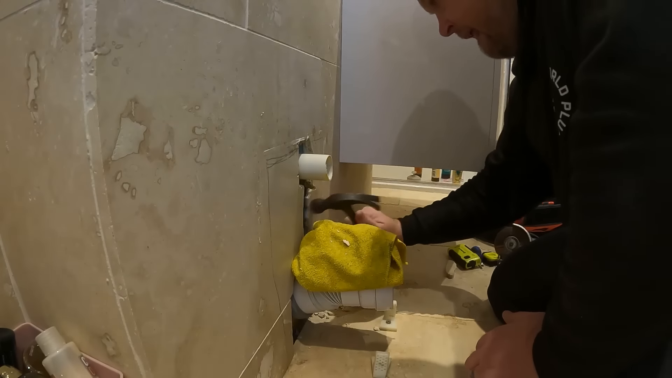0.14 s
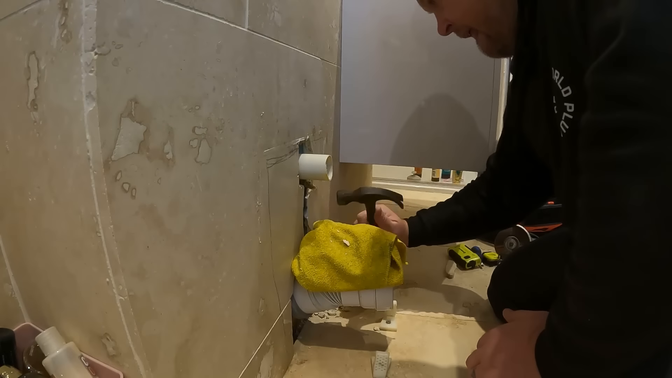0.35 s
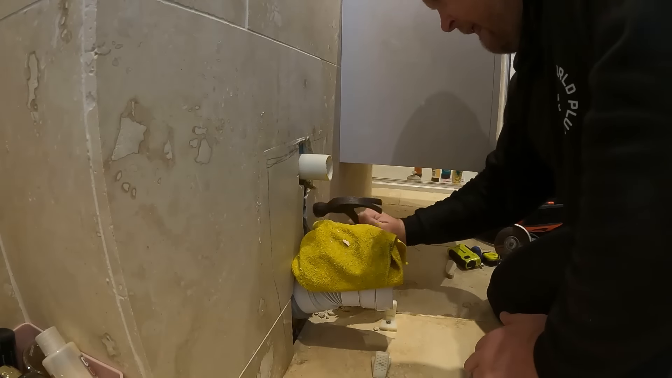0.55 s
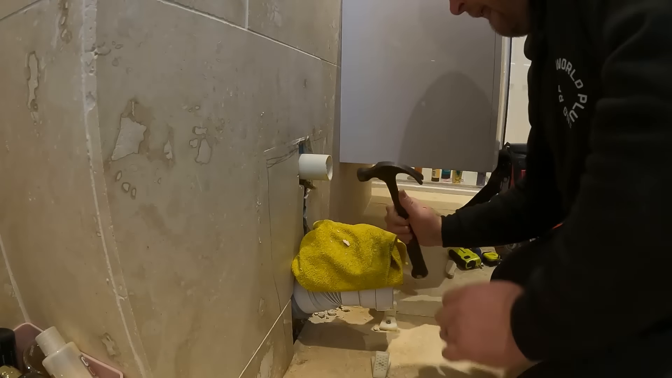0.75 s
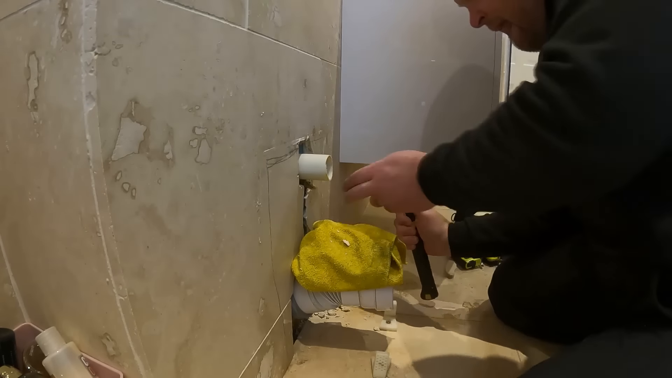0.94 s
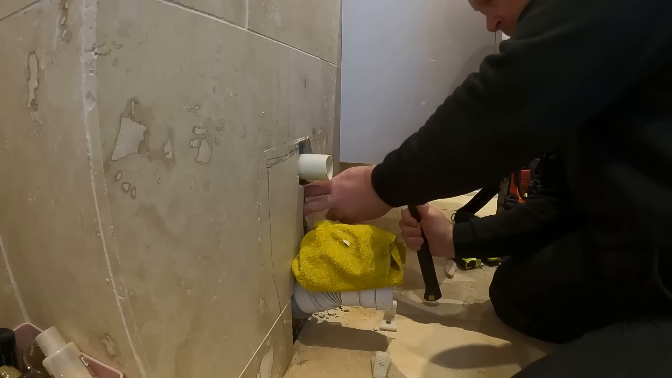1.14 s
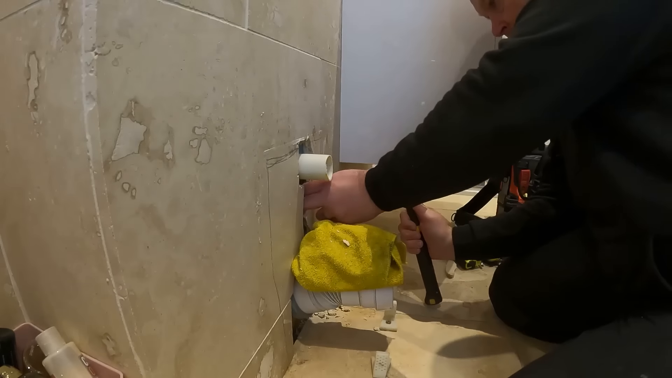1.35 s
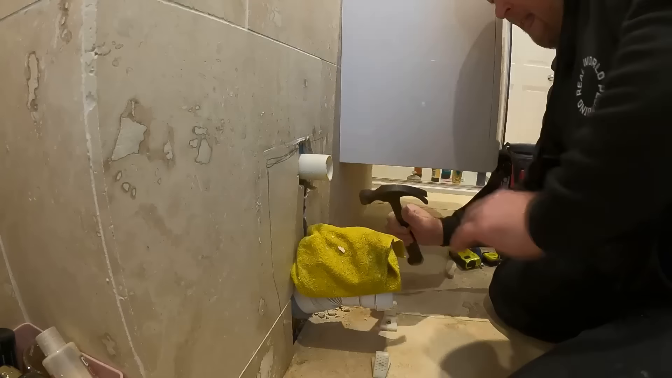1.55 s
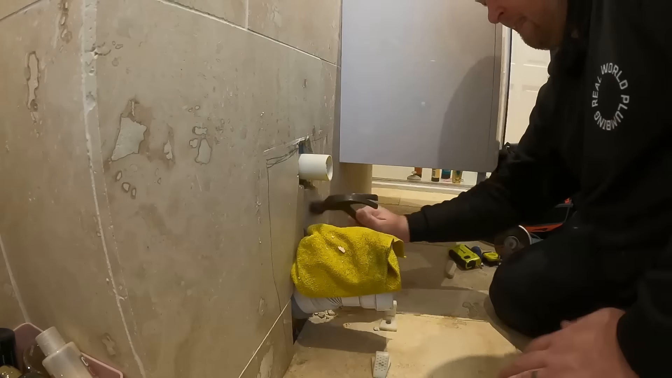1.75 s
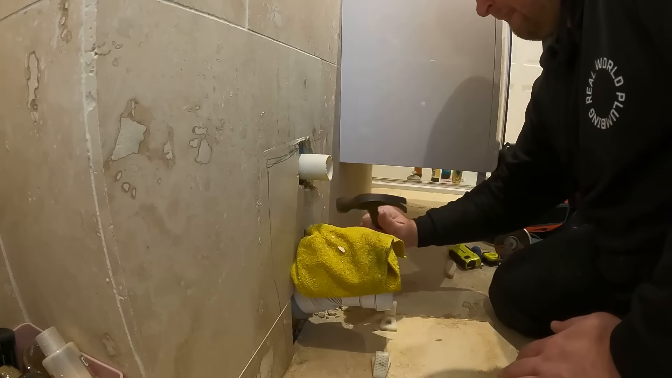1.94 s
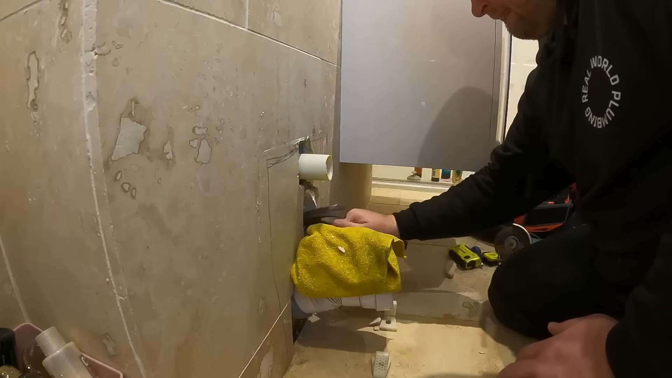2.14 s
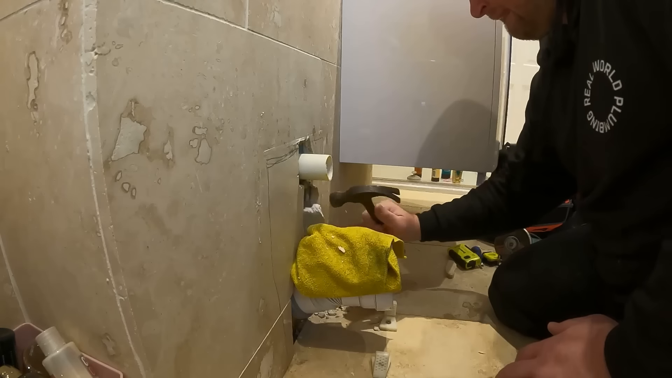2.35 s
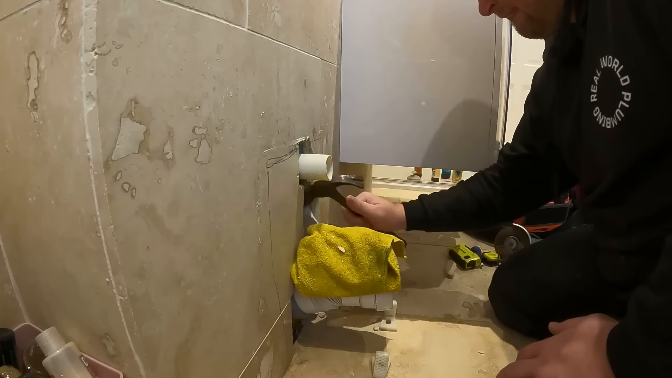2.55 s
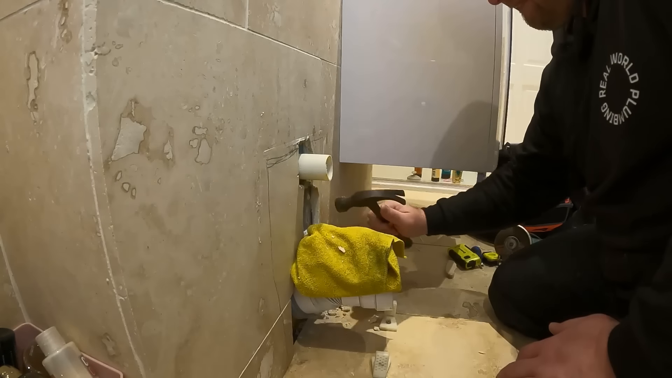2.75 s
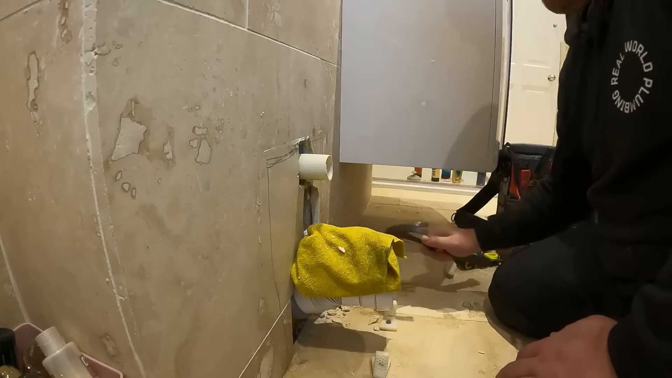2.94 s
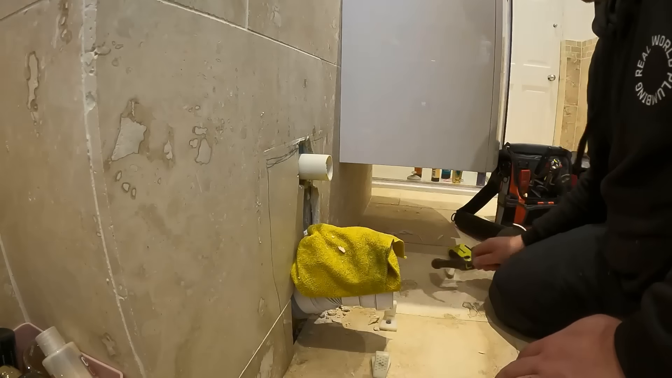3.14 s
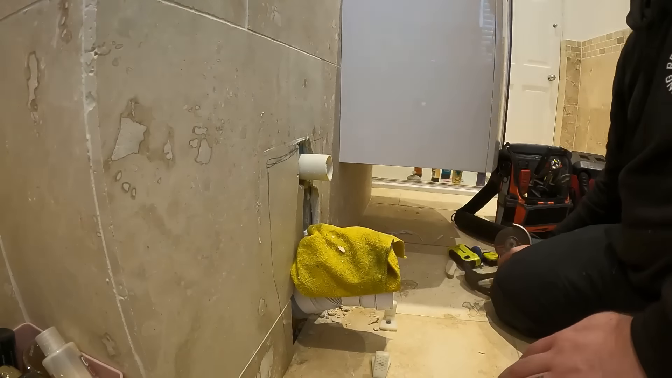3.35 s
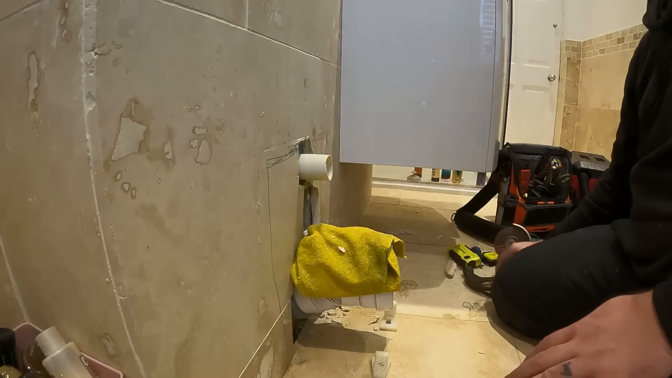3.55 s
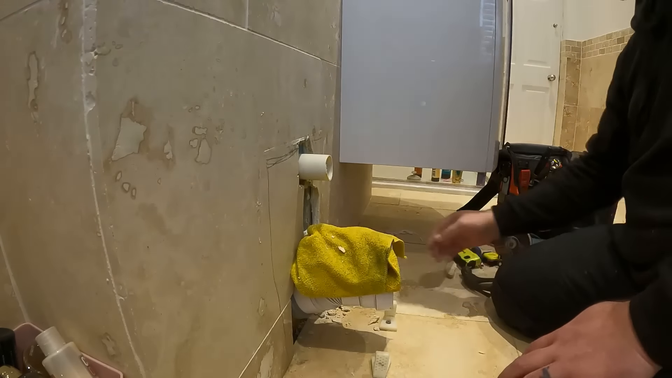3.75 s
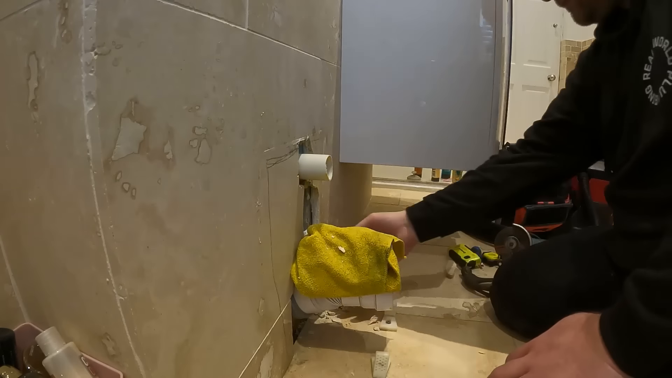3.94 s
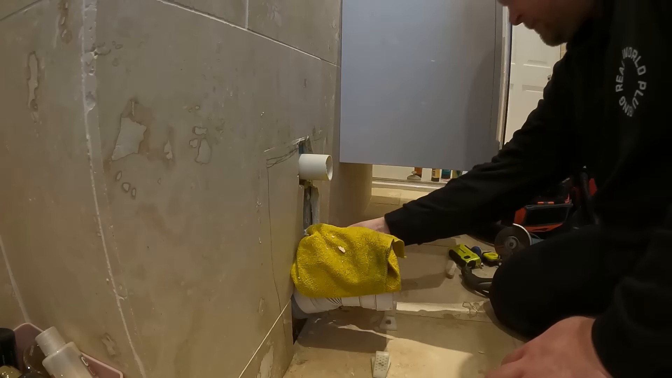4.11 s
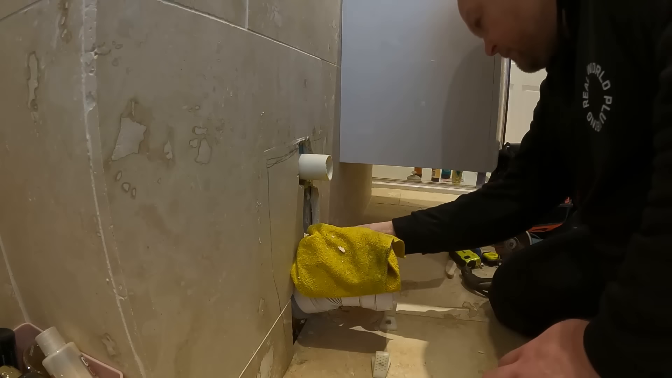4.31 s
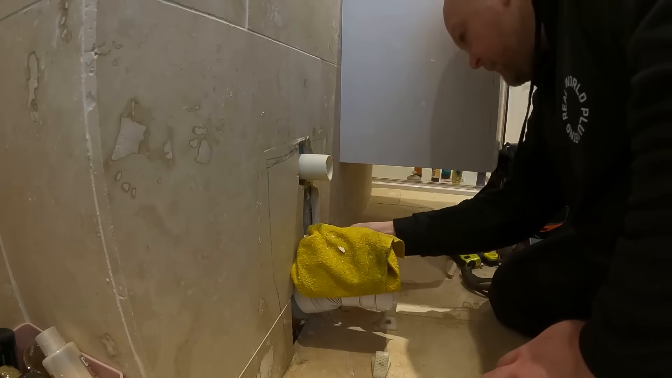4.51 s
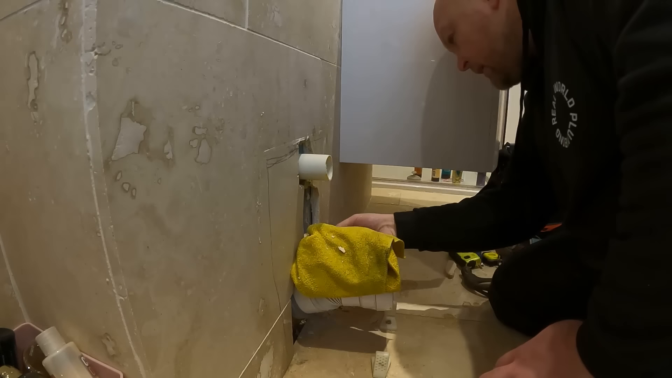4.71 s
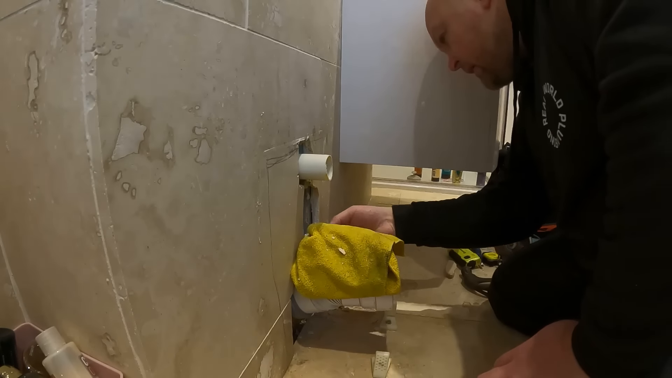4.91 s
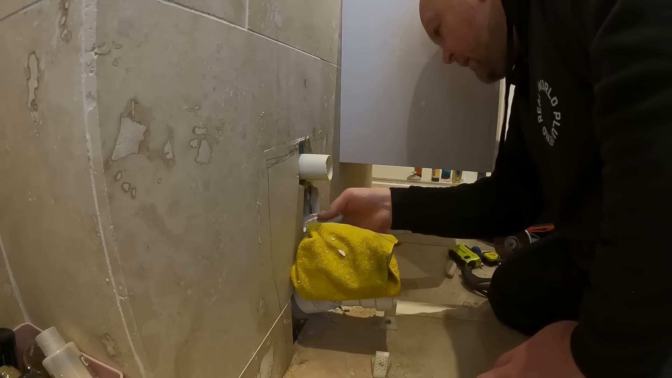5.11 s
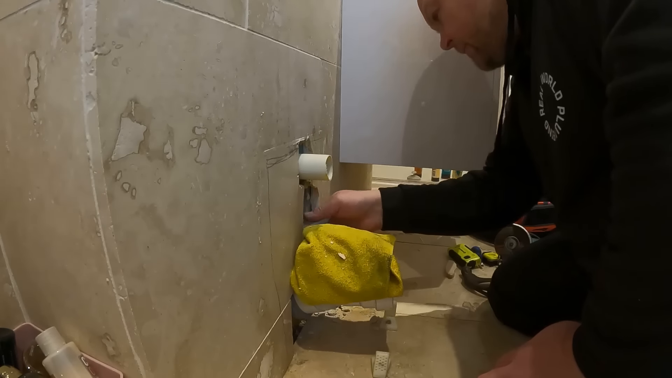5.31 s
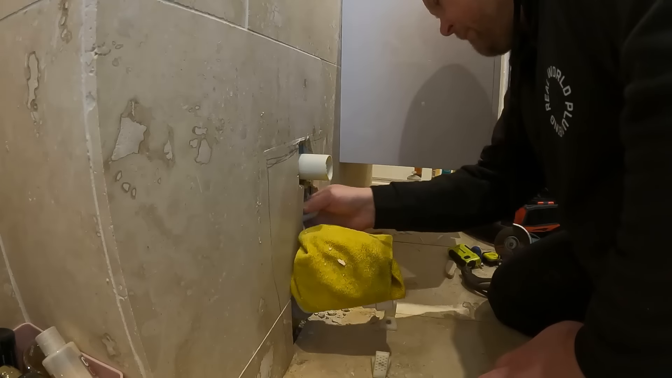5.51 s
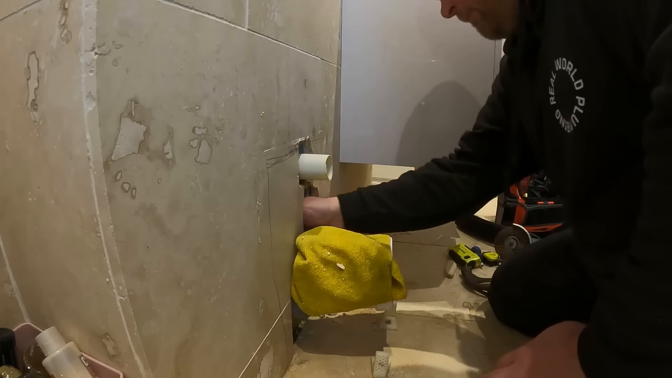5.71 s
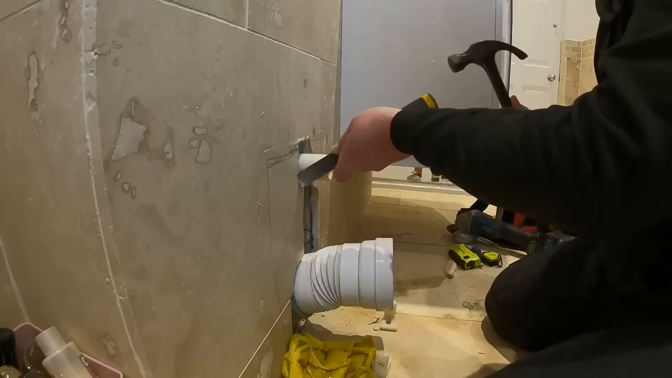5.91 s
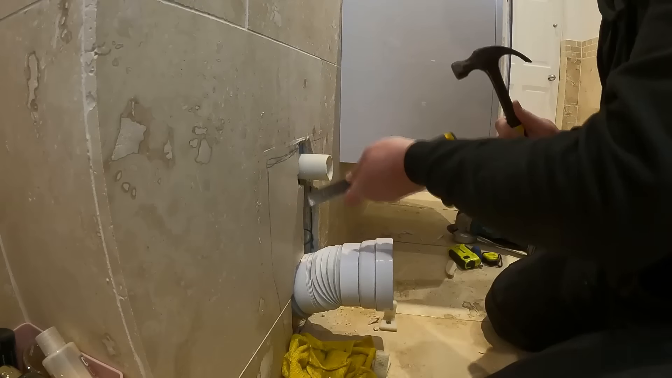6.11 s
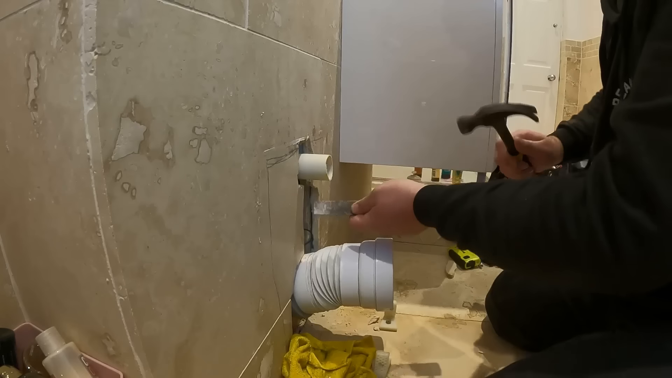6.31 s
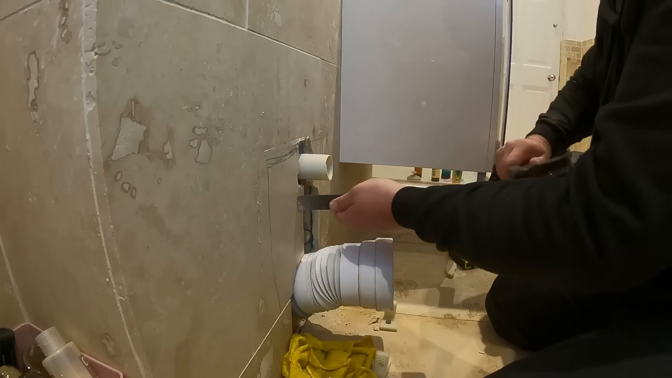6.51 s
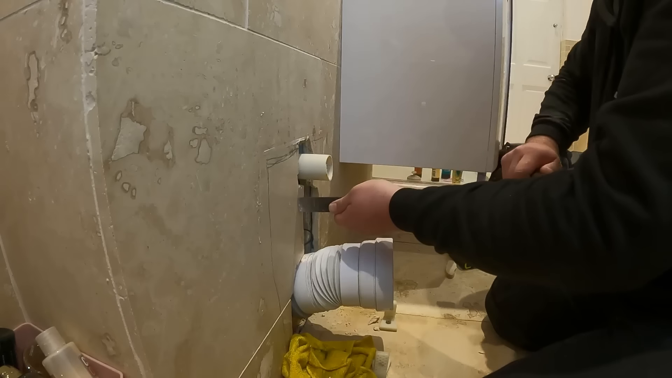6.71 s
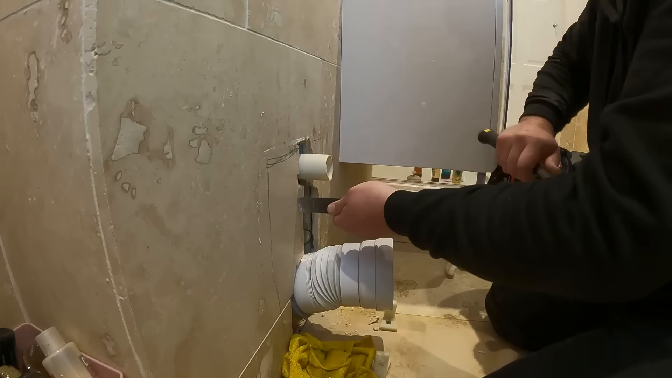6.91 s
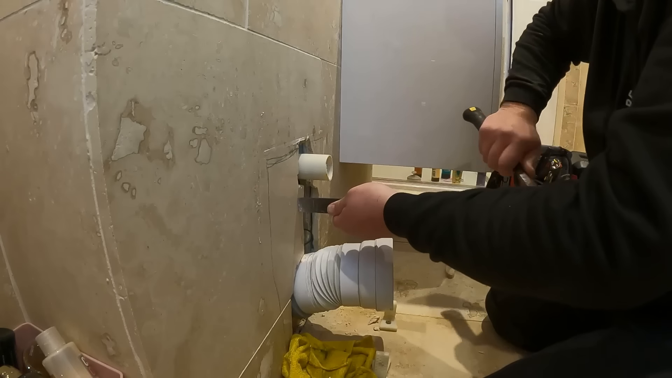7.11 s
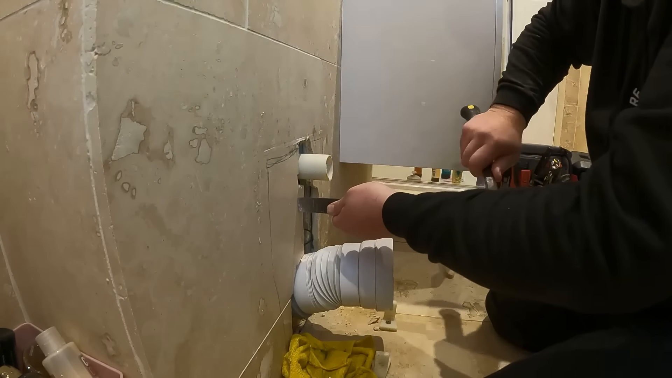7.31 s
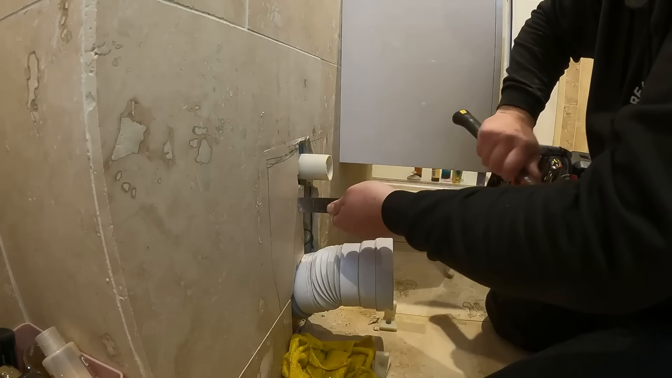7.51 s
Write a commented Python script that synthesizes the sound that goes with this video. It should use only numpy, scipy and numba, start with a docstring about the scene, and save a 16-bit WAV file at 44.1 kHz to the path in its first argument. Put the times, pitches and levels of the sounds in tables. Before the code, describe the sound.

Close, sharp hammer strikes on tile with dense bathroom echo, followed by rummaging in grit, clacking fragments, soft thuds and late low rumble.

```python
"""The tail of a hammer blow is still ringing in a hard bathroom when the next blows land close to a small
camera. Tiles come off the wall: each contact ticks, cracks, rings damped tile and hammer modes and thumps the
boxed wall. Shards clack and slide, tools are set down, a hand rummages in grit behind a pipe; thin high tones
flicker. Dense echoes hang for most of a second; the camera's gain control ducks at each loud blow, so the room
seems to swell just after it. Steady building noise lies behind; late on, the background holds more bass noise."""
import sys
import numpy as np
from scipy import signal
from scipy.fft import rfft, irfft
from scipy.io import wavfile
from scipy.ndimage import uniform_filter1d, minimum_filter1d
from numba import njit

SR = 44100
rng = np.random.default_rng(int(sys.argv[2]) if len(sys.argv) > 2 else 0)


def wav_record(signal):
    """Record a signal, one row per channel, as 16-bit PCM in the file named by sys.argv[1]."""
    frames = np.transpose(np.atleast_2d(signal))
    bounded = np.clip(frames, -1, 1)
    # unit amplitude maps onto the largest positive 16-bit level
    quanta = np.round(bounded * 32767).astype(np.int16)
    wavfile.write(sys.argv[1], SR, quanta)


N = 333382
LEAD = 13230  # samples played before the start, so that an earlier blow still rings

# Levels are those ahead of the microphone colour and the gain control.
# hammer on tile, floor or chisel; ring, thump and room are relative to the level:
# start_s, level_db, pitch_hz, tilt_db_per_octave, ring_db, thump_db, room_db
BLOWS = [(-.27, 20.5, 1760, 5.5, -11, -18, -12), (.0285, 13, 2300, 2, -1, -9, 1.5),
         (.3255, 10, 2300, 1, -0.5, -9, 4), (.6068, 5.5, 2300, 1, 0.5, -7.5, 6),
         (1.9185, 17.5, 5150, -3.5, -1.5, -14, -3.5), (2.1360, 2, 4600, -0.5, -20, -33, 1.5),
         (2.2083, 13.5, 5520, -3.5, 4, -18.5, -0.5), (2.7640, -9.5, 1060, -1, -2.5, -5, 4.5),
         (3.5283, -1, 2130, -1.5, 1.5, -7, 6), (3.6206, 8, 2770, 0.5, 7, -13, 2),
         (3.7892, -7, 2260, -3.5, 9, -8, 8), (6.6746, -5, 1560, -4, 3.5, -1, 0),
         (7.4830, -7.5, 1800, -3, 7.5, 3, 1.5)]
# shards and tools touching: start_s, level_db, pitch_hz, ring_db, room_db
CLACKS = [(1.5863, -29, 3900, -19, 20), (1.8894, -30, 1800, -3, 26), (2.605, -15.5, 1370, 0.5, 5),
          (2.6925, -20.5, 1510, -1, 1), (2.735, -26, 2540, 0, 9), (2.807, -25.5, 3000, 4, -11),
          (2.970, -20.5, 3600, -8, 0), (2.984, -33, 3600, -6, 6), (3.041, -32, 2620, 1, -11),
          (3.1943, -32.5, 3660, -6, 15.5), (3.284, -45, 3170, 9, -1), (4.3001, -28.5, 3120, -10, 21.5),
          (4.314, -16.5, 3200, -3.5, 4), (4.4014, -30, 1900, -4, 6), (4.4351, -15, 2350, 0, 3),
          (4.46, -20.5, 2280, 3, 4.5), (4.476, -12.5, 2350, -6, -10), (4.613, -24.5, 2210, 1, 7),
          (4.8202, -10, 4680, 5, 8), (4.915, -17.5, 3600, 4, 7), (4.952, -29, 950, -7, 1),
          (5.0287, -28, 2600, -2, 12), (5.0865, -22.5, 1560, -11, -6), (5.093, -29, 1560, -2, -11),
          (5.108, -23.5, 1520, -1, 4), (5.1349, -25.5, 950, 3, -3), (5.1436, -23, 940, 4, 1),
          (5.1596, -16, 2020, 0, 9), (5.169, -17, 1300, -6, -3.5), (5.181, -26.5, 940, 10.5, -7),
          (5.2219, -20.5, 1840, 1, -20), (5.252, -29, 1990, 4, 10.5), (5.3843, -26.5, 2224, -4, -1),
          (5.486, -39, 950, 4.5, 9), (5.5071, -14, 2670, 1.5, -1), (5.523, -13.5, 1180, -0.5, 0),
          (5.552, -28, 2300, -5, 4), (5.571, -26, 2500, 0, 2), (5.6908, -24, 2300, 1, -20),
          (5.7479, -24.5, 3000, -7, 2), (6.0412, -38, 1515, -3, 3), (6.0523, -23.5, 1670, -9, 3),
          (6.075, -25.5, 1560, -5, 3), (6.095, -32, 2270, 0, 4), (6.2358, -26, 1600, -4.5, -11),
          (6.247, -27.5, 3600, -7, 6), (6.3736, -24, 5300, -4.5, -4), (6.3959, -26.5, 5080, -5, 6),
          (6.404, -30, 5050, -4, -6), (6.6451, -26.5, 1300, 2.5, 13.5), (6.772, -29, 1510, 15, -1)]
# soft knocks of hand, knee or bag on the boxed wall and floor:
# start_s, level_db, pitch_hz, ring_length (multiplies the wall's t60)
THUDS = [(1.575, -36.5, 400, 1.9), (1.893, -16, 200, 0.42), (2.61, -23.5, 143, 2.4), (3.804, -7.5, 65, 2.4),
         (4.324, -20, 176, 1.5), (4.34, -19, 420, 0.95), (4.631, -25.5, 131, 4.6),
         (4.715, -10.5, 129, 0.15), (5.022, -23, 122, 0.68), (5.14, -21, 124, 1.6),
         (5.201, -21.5, 122, 1.2), (5.225, -15, 430, 0.85), (5.258, -22, 396, 0.38),
         (5.521, -2.5, 248, 0.61), (5.539, -9.5, 77.6, 2), (5.581, -9, 187, 0.59), (5.841, -34, 240, 0.91),
         (6.051, -27.5, 195, 1.2), (6.646, -6, 146, 0.25), (6.721, -5, 166, 0.35)]
# level curve of hand and cloth among grit: time_s, level_db
RUMMAGE = [(1.57, -63), (1.638, -41.5), (1.764, -54.5), (1.9, -45), (3.05, -52), (3.358, -57), (3.5, -42.5),
           (4.18, -56), (4.484, -41), (4.87, -39), (5.062, -44.5), (5.23, -49), (5.342, -40), (5.574, -70),
           (5.83, -52), (6.05, -49), (6.43, -49), (6.65, -58.5)]
# hammer head dragged on the floor: start_s, hold_s, level_db
SCRAPE = (3.286, 0.11, -45.5)
# short bursts of thin high flickering tones: start_s, hold_s, level_db
FLICKER = [(2.68, 0.13, -50), (4.29, .1, -48), (4.47, .03, -40), (4.656, 0.06, -46), (4.816, 0.027, -30),
           (4.904, 0.12, -48), (5.48, .02, -42.5), (5.524, 0.018, -44), (5.605, 0.16, -48)]
# heaps of broken tile that slide and settle: start_s, hold_s, level_db (per mode, at the pitch), pitch_hz
CRUMBLE = [(5.127, 0.023, -45, 1030), (5.518, 0.021, -33.5, 2310), (6.045, 0.041, -44.5, 1700),
           (6.766, 0.019, -30, 1052)]
# damped modes of the tiles, and near 5 kHz of the steel hammer head: mode_hz, relative_db, t60_s
STRUCK_MODES = [(934, 18.5, 0.018), (1193, 12.5, 0.0058), (1560, 7, 0.016), (1800, 8, 0.012),
                (2300, 10.5, 0.0088), (2724, 4, 0.0091), (3600, 11, 0.0058), (4346, 1, 0.008),
                (5010, 1.5, 0.017), (5050, -11, 0.057), (5540, 8.5, 0.012), (6100, -7, 0.0036),
                (7100, -22.5, .012), (8200, -1, 0.0093)]
# modes of the boxed wall before detuning and damping: mode_hz, relative_db, t60_s
WALL_MODES = [(65.4, -9, 0.21), (102.3, -4, 0.26), (122, -12, 0.74), (146, -1.5, 0.28), (177.4, -8.5, 0.37),
              (204.3, -11, 0.22), (240, -1, 0.13), (289.8, -4, 0.076), (320.7, -1.5, 0.038),
              (421.6, -21, 0.24)]
# thin high tones around 7 and 10 kHz: tone_hz, relative_db, t60_s
FLICKER_TONES = [(7120, 0, .03), (7270, 0, .03), (10150, -12, .02)]
# the bathroom's echoes by band: band_hz, relative_db, t60_s
ROOM_BANDS = [(65, 20, 0.64), (170, -5, 0.51), (405, 17.5, 0.92), (1120, 5, 0.81), (2253, 0, 0.88),
              (3800, 2.5, 0.86), (7200, -5, 0.93), (14000, 9, 0.18)]
# spectrum of the building noise: freq_hz, relative_db
HOUSE_SPECTRUM = [(18, -64.5), (30, -51), (108, -6), (207, -17.5), (593, -24), (930, -32), (1830, -32.5),
                  (8660, -45), (12000, -52.5), (15600, -83.5), (22000, -120)]
# frequency response of the camera microphone: freq_hz, gain_db
MIC_RESPONSE = [(15, -45), (45, -27.5), (70, -21), (150, -2), (1400, 1.5), (2300, 1), (3050, 1), (3350, -2),
                (5050, -4.5), (5700, -6.5), (6600, -9.5), (7600, -15), (8800, -24), (9150, -30),
                (9500, -17), (12000, -36), (16000, -51)]
# spectra of grit under the hand, of the scrape and of the late bass noise: freq_hz, relative_db
GRIT_SPECTRUM = [(200, -38.5), (900, 16.5), (3000, 3.5), (8000, 11.5), (14000, 12.0)]
SCRAPE_SPECTRUM = [(2000, -34), (2850, -11), (3200, -8.5), (3600, -18), (7000, -21.5)]
LATE_BASS_SPECTRUM = [(15, 1), (35, 1), (55, 1), (85, -33.0), (150, -29.0), (500, -32.5), (2000, -38.0),
                      (7000, -53.5), (9000, -60)]

SPOT_DB = 1.5  # how much the mode mix varies from one contact to the next
# a clack at 2 kHz; smaller pieces sound higher, crack brighter and thump less
CLACK_TILT_DB, CLACK_THUMP_DB = -0.52, -11.5  # tilt is in dB per octave
TILT_DB_PER_OCT, THUMP_DB_PER_OCT = 2.5, -5.5  # change per octave of pitch
THUD_CYCLES, THUD_ROOM_DB = 0.13, -7  # the push lasts this share of a cycle at the pitch
HAND_ROOM_DB = -6.5
# times to rise or fall by 60 dB
SCRAPE_RISE_S, SCRAPE_FALL_S = 0.04, 0.35
FLICKER_RISE_S, FLICKER_FALL_S = 0.018, 0.24
CRUMBLE_RISE_S, CRUMBLE_FALL_S = 0.068, 0.19
HOUSE_DB = -52
LATE_BASS_S, LATE_BASS_DB = 6.5, -28.5
TOP_HZ = 16500  # top of the camera's band


def hits(events, spread_oct, broad_oct, crack_s, rise_s, far_ring_db, tick_db):
    """Each contact ticks, cracks, rings tile and hammer modes near its pitch and thumps the wall; returns
    direct sound and what reaches the walls from three spots."""
    near, far = np.zeros(N + LEAD), np.zeros((3, N + LEAD))
    t = np.arange(2048) / SR
    octave = np.arange(-5, 4.1, .5)  # from 1 kHz
    tick = 1. * (t == 0)
    onset = 1 - np.exp(-t / rise_s)
    for k, (s, db, hz, tilt, ring_db, thump_db, room_db) in enumerate(events):
        tone = ring(STRUCK_MODES, near_pitch(STRUCK_MODES, hz, spread_oct, SPOT_DB), size=len(t)) * onset
        tone *= undb(ring_db) / np.abs(tone).max()

        # a tilted hump around the pitch
        hump_db = tilt * octave - 3 * ((octave - np.log2(hz / 1000)) / broad_oct) ** 2
        broad = np.c_[1000 * 2 ** octave, hump_db]
        crack = colour(rng.standard_normal(len(t)) * np.exp(-t / crack_s) * onset, broad)
        crack /= np.abs(crack).max()
        snap = colour(tick, broad)
        snap /= np.sqrt(np.sum(snap ** 2))
        boom = thump(119, 1.224, 1.82, 0.9) * undb(db + thump_db)

        add(near, s, (tone + crack + undb(tick_db) * tick) * undb(db))
        add(near, s, boom)
        # all round the tool the contact is a broad snap; the boom goes with it,
        # the ring reaches the walls from another spot
        add(far[k % 3], s, undb(db + room_db + 10.5) * snap)
        add(far[(k + 1) % 3], s, undb(db + room_db + far_ring_db) * tone)
        add(far[k % 3], s, boom * undb(-5.5))
    return near, far


def clacks():
    """Rows for hits(): tilt and thump of each clack follow from its pitch."""
    s, db, hz, ring_db, room_db = np.transpose(CLACKS)
    octaves_up = np.log2(hz / 2000)
    tilt = CLACK_TILT_DB + TILT_DB_PER_OCT * octaves_up
    thump_db = CLACK_THUMP_DB + THUMP_DB_PER_OCT * octaves_up
    return np.c_[s, db, hz, tilt, ring_db, thump_db, room_db]


def thuds():
    """A soft contact only booms; returns direct sound and what reaches the walls."""
    near = np.zeros(N + LEAD)
    for s, db, hz, length in THUDS:
        push_ms = THUD_CYCLES / hz * 1000
        add(near, s, undb(db) * thump(hz, 0.47, push_ms, length))
    return near, near * undb(THUD_ROOM_DB)


def thump(hz, spread_oct, push_ms, length):
    """The boxed wall booms after a smooth push, detuned a little and damped by whatever leans on it."""
    held = np.array(WALL_MODES) * [1, 1, length]
    held[:, 0] *= 1 + 0.015 * rng.standard_normal(len(WALL_MODES))
    push = np.hanning(max(int(push_ms * SR / 1000), 3))
    boom = ring(held, near_pitch(WALL_MODES, hz, spread_oct, SPOT_DB), size=SR // 2)
    return signal.fftconvolve(boom, push / push.sum())


def near_pitch(modes, hz, spread_oct, scatter_db):
    """Mode gains: strongest near the pitch, a little different at each spot; neighbours in antiphase."""
    octaves_off = np.log2(np.array(modes)[:, 0] / hz)
    near = np.exp(-.5 * (octaves_off / spread_oct) ** 2)
    return near * undb(scatter_db * rng.standard_normal(len(modes))) * (-1) ** np.arange(len(modes))


def ring(modes, gains, size):
    """Response of damped modes to a tap: a sum of decaying sines."""
    hz, db, t60 = np.transpose(modes)
    t = np.arange(size)[:, None] / SR
    return (np.sin(2 * np.pi * hz * t) * np.exp(-np.log(1000) * t / t60)) @ (gains * undb(db))


def rummage():
    """Hand in grit, dragged hammer head, sliding shards and flickering tones, all driven by random grains."""
    hand = grit() * curve(RUMMAGE)
    hand += scrape()
    hand += shards()
    hand += flicker()
    return np.pad(hand, (LEAD, 0))


def grit():
    """Grains under the hand, coloured strongest near 900 Hz with plenty of treble, at unit level."""
    return unit(colour(grains(4., .11), GRIT_SPECTRUM))


def scrape():
    """Sparser grains under the dragged hammer head, coloured around 3 kHz."""
    rub = unit(colour(grains(1.7, 0.024), SCRAPE_SPECTRUM))
    return rub * burst(*SCRAPE, SCRAPE_RISE_S, SCRAPE_FALL_S)


def shards():
    """Separate small knocks; each rings the struck modes in its own mix, near the pitch of its heap."""
    knocks, out = grains(2.5, .014), 0
    weights = np.array([near_pitch(STRUCK_MODES, hz, 0.49, SPOT_DB) for *_, hz in CRUMBLE])
    levels = np.array([burst(*row[:-1], CRUMBLE_RISE_S, CRUMBLE_FALL_S) for row in CRUMBLE])
    for weight, mode in zip(weights.T, STRUCK_MODES):
        tap = ring([mode], np.ones(1), size=2048)
        rung = signal.fftconvolve(knocks * rng.standard_normal(N), tap)[:N]
        out = out + unit(rung) * (weight @ levels)
    return out


def flicker():
    """Thin high flickering tones in short bursts: dense grains ring decaying sines around 7 and 10 kHz."""
    tap = ring(FLICKER_TONES, np.ones(3), size=4096)
    tones = unit(signal.fftconvolve(grains(3., .2), tap)[:N])
    return tones * sum(burst(*row, FLICKER_RISE_S, FLICKER_FALL_S) for row in FLICKER)


def grains(spike_db, density):
    """Scattered grains, a few much bigger than the rest; density is the share of samples struck."""
    size = np.minimum(rng.exponential(size=N), 3)
    return rng.standard_normal(N) * undb(spike_db * size) * (rng.random(N) < density)


def burst(s, hold_s, db, rise_s, fall_s):
    """Gain that rises to s, holds and dies away, straight in dB."""
    t = np.arange(N) / SR - s
    slope = np.maximum(-t / rise_s, (t - hold_s) / fall_s)
    return undb(db - 60 * np.maximum(slope, 0))


def curve(rows, fade_s=0.0067):
    """Gain from a dB table, silent outside it."""
    t = np.arange(N) / SR
    s, db = np.transpose(rows)
    edge = np.clip(np.minimum(t - s[0], s[-1] - t) / fade_s, 0, 1)
    return undb(np.interp(t, s, db)) * edge


def room(x, gap_s=0.00022, build_s=0.0014):
    """Dense echoes of the hard room: half-octave noise bands that build up and then die at their own rates."""
    t, echoes = np.arange(int(1.5 * SR)) / SR, 0
    hz, db, t60 = np.transpose(ROOM_BANDS)
    for f in 45 * 2 ** np.arange(0, 8.5, .5):
        sos = signal.butter(2, [f * .84, f * 1.19], "band", fs=SR, output="sos")
        band = signal.sosfilt(sos, rng.standard_normal(len(t)))
        band_db = np.interp(np.log(f), np.log(hz), db)
        band_t60 = np.interp(np.log(f), np.log(hz), t60)
        echoes = echoes + band * undb(band_db - 60 * t / band_t60)
    echoes = echoes * (1 - np.exp(-np.maximum(t - gap_s, 0) / build_s))
    return signal.fftconvolve(x, echoes / np.sqrt(np.sum(echoes ** 2)))[:len(x)]


def house():
    """Steady noise of the building: coloured noise."""
    return unit(colour(rng.standard_normal(N), HOUSE_SPECTRUM)) * undb(HOUSE_DB)


def late_bass():
    """The background changes late: more bass noise from there on."""
    bass = unit(colour(rng.standard_normal(N), LATE_BASS_SPECTRUM))
    return bass * burst(LATE_BASS_S, N / SR, LATE_BASS_DB, 0.13, 1)


def undb(db):
    """Amplitude factor of a level in dB."""
    return 10 ** (np.asarray(db) / 20)


def unit(x):
    """Scale to an RMS of one."""
    return x / np.sqrt(np.mean(x ** 2))


def add(track, s, sound):
    """Lay a sound into a track that begins LEAD samples early."""
    i = int(s * SR) + LEAD
    track[i:i + len(sound)] += sound[:len(track) - i]


def colour(x, points):
    """Shape the spectrum by (Hz, dB) points without sounding early (minimum phase)."""
    hz, db = np.transpose(points)
    bin_hz = np.arange(4097) * SR / 8192
    log_gain = np.interp(np.log(bin_hz + 1), np.log(hz), db) * np.log(10) / 20
    # folding the cepstrum onto positive time makes the filter causal
    cepstrum = irfft(log_gain)
    cepstrum[1:4096] *= 2
    cepstrum[4097:] = 0
    return signal.fftconvolve(x, irfft(np.exp(rfft(cepstrum))))[:len(x)]


def scene():
    """Direct sound close to the camera, its echoes from three spots, and the background."""
    blow_near, blow_far = hits(BLOWS, spread_oct=0.52, broad_oct=1.43, crack_s=0.0039, rise_s=0.0002,
                               far_ring_db=-9.5, tick_db=2.5)
    clack_near, clack_far = hits(clacks(), spread_oct=0.34, broad_oct=2.55, crack_s=0.0089, rise_s=0.0001,
                                 far_ring_db=-9.5, tick_db=-6.5)
    thud_near, thud_far = thuds()
    hand = rummage()
    far = blow_far + clack_far
    far[0] += thud_far + undb(HAND_ROOM_DB) * hand
    echoes = sum(room(spot) for spot in far)
    work = blow_near + clack_near + thud_near + hand + echoes
    return (work[LEAD:] + house() + late_bass())[None]


@njit
def duck(need, attack, release):
    """Gain in dB that drops fast to what is needed and creeps back."""
    out, g = np.empty(len(need)), 0.
    for i in range(len(need)):
        g += (need[i] - g) * (attack if need[i] < g else release)
        out[i] = g
    return out


def record(dry, top_db=-8.5, ratio=6.95, ahead_s=0.011, window_s=0.0012, attack_s=0.01, release_s=0.063):
    """Microphone colour, gain control that looks a little ahead, clipping, top cut."""
    x = colour(dry[0], MIC_RESPONSE)
    power = uniform_filter1d(x ** 2, int(window_s * SR) + 1)
    level_db = 10 * np.log10(power.clip(1e-12))
    need = -np.maximum(level_db - top_db, 0) * (1 - 1 / max(ratio, 1))
    half = int(ahead_s * SR / 2)
    need = minimum_filter1d(need, 2 * half + 1, origin=-half)  # the window lies wholly ahead
    x = x * undb(duck(need, 1 / (attack_s * SR), 1 / (release_s * SR)))
    x = np.clip(1.2 * np.tanh(x / 1.2), -1, 1)  # peaks round off before they clip
    return signal.sosfilt(signal.ellip(8, .2, 70, TOP_HZ, fs=SR, output="sos"), x)[None]


dry = scene()
out = record(dry)
wav_record(out)
```